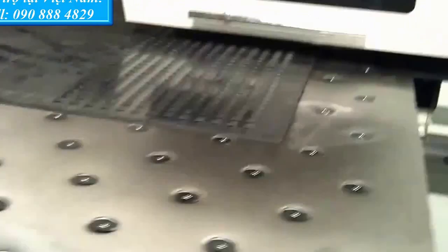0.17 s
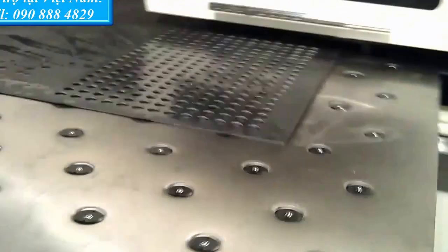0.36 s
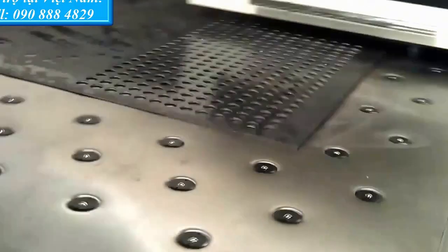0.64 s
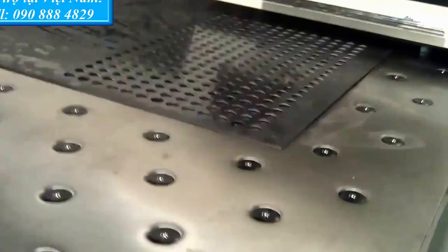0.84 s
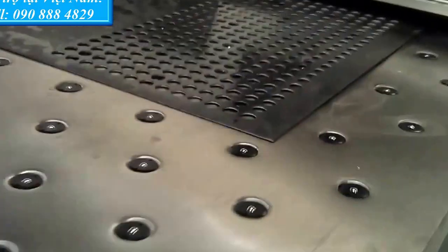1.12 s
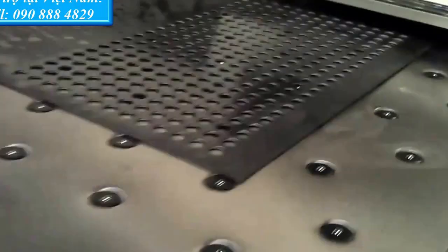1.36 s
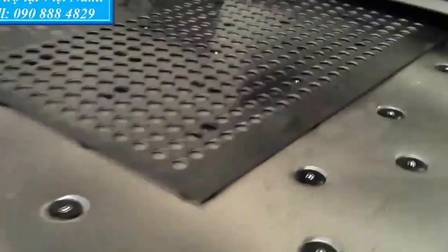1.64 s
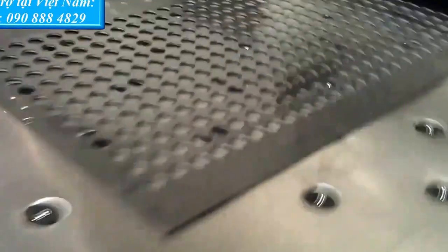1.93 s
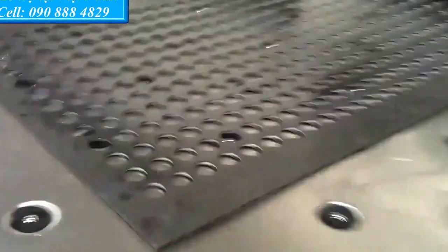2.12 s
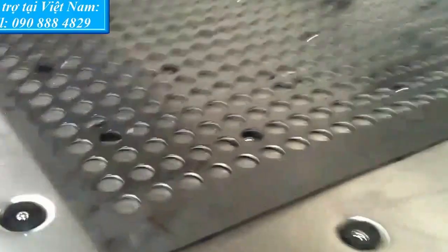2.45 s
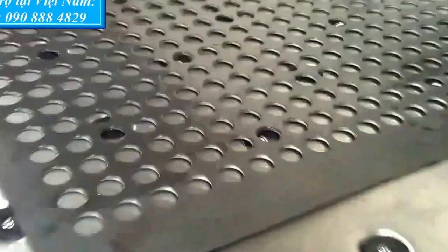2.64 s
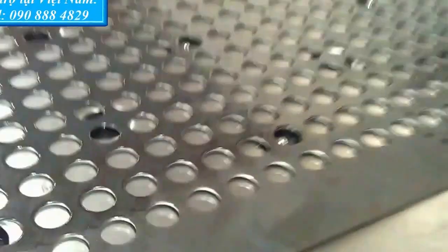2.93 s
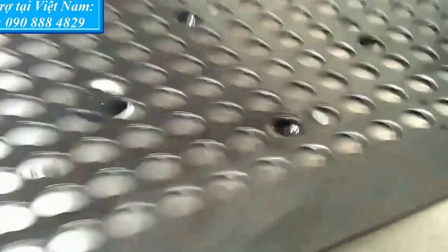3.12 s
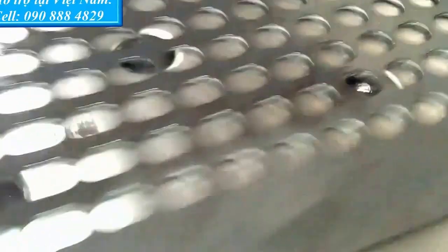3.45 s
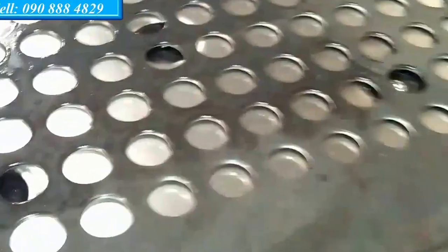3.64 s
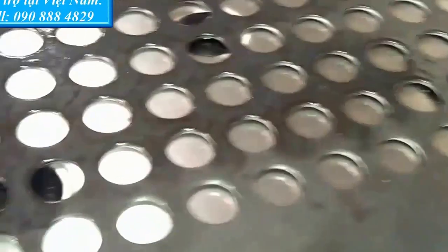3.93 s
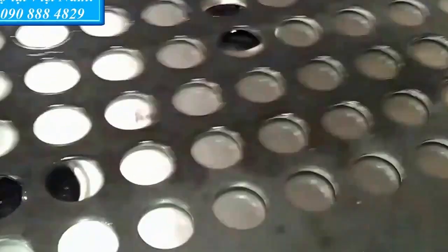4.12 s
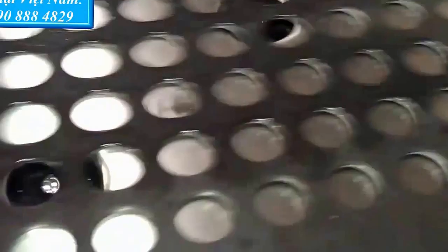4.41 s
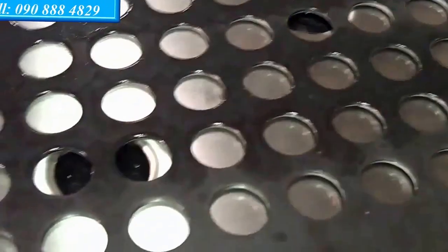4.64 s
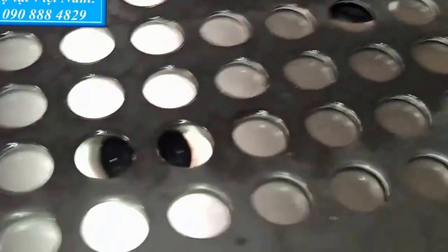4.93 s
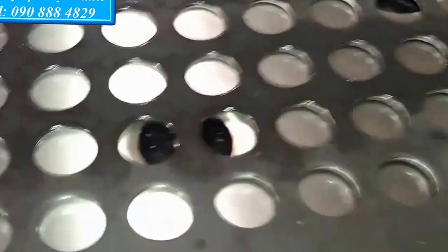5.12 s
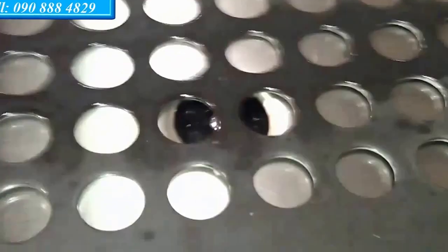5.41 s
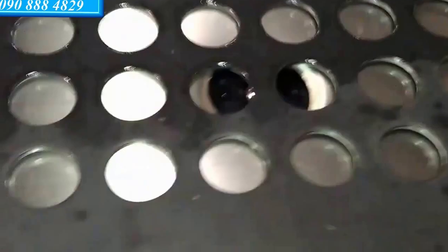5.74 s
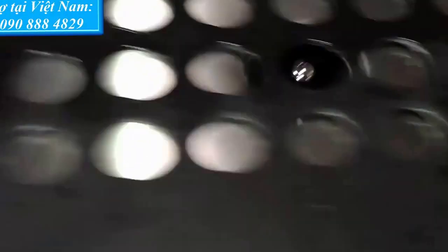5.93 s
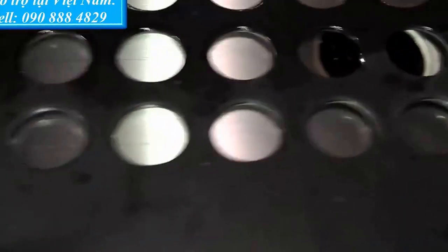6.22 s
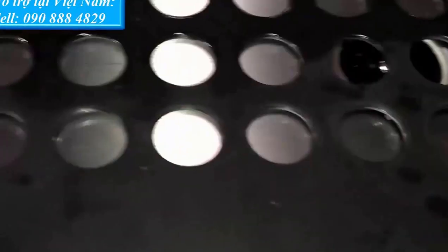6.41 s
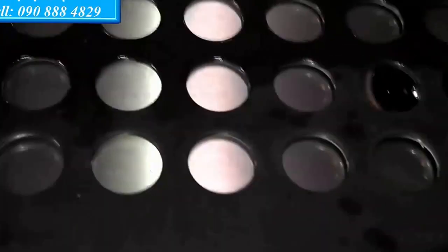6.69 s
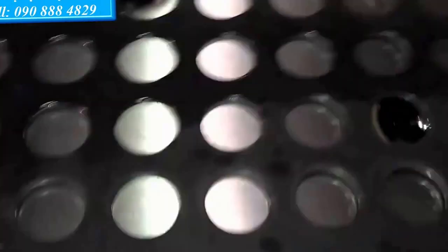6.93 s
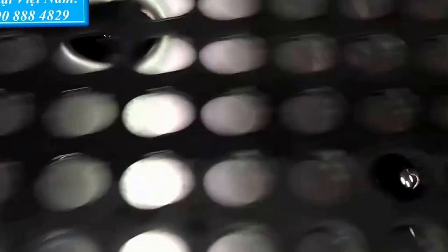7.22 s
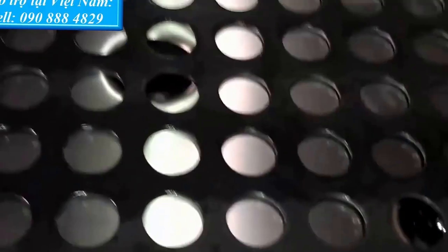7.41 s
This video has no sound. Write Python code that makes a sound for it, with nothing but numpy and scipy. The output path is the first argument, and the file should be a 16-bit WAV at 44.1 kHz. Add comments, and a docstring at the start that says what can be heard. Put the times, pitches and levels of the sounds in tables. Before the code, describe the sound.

Rapid, evenly spaced metallic punches ring out close by, with a steel sheet rumbling and scraping between them while hydraulics and fans run.

```python
"""Turret punch press, close up

A stereo pair edges in over a steel sheet being perforated, about three strokes a second.
Before each stroke the sheet is dragged over the ball table: it rumbles and rattles ever louder,
sometimes squealing. The stripper plate pins it, the punch breaks through with a ringing crack,
and the returning ram stops with a softer clack. Hydraulics and fans run on underneath."""
import sys
import numpy as np
from scipy import signal
from scipy.fft import rfft, irfft, next_fast_len
from scipy.io import wavfile
from scipy.ndimage import uniform_filter1d, map_coordinates

SR = 44100
rng = np.random.default_rng(int(sys.argv[2]) if len(sys.argv) > 2 else 0)


def store_pcm(level_fs):
    """Save levels as 16-bit WAV."""
    pcm = np.round(np.clip(level_fs, -1, 1) * 32767).astype(np.int16)
    wavfile.write(sys.argv[1], SR, np.atleast_2d(pcm).T)


N = 333396
TIME = np.arange(N) / SR


def amp(db):
    """Decibels to gain."""
    return np.exp(np.maximum(db, -300) * np.log(10) / 20)


def unit(x):
    """Scaled to rms 1."""
    return x / np.sqrt(np.mean(x ** 2) + 1e-20)


def along(points, hz):
    """(Hz, value) points joined on a log axis."""
    f, v = np.transpose(points)
    return np.interp(np.log(hz + 1), np.log(f + 1), v)


def wobble(rate):
    """A smooth random curve, rate knots a second."""
    return map_coordinates(rng.standard_normal(int(N * rate / SR) + 4), [TIME * rate])


def filtered(x, response):
    """x times a complex response of frequency."""
    size = next_fast_len(N + SR // 2)
    return irfft(rfft(x, size) * response(np.fft.rfftfreq(size, 1 / SR)), size)[..., :N]


def noise():
    """Two unrelated white noises."""
    return rng.standard_normal((2, N))


def contacts(rate, spread_db, smooth):
    """Random tiny impacts of uneven size, blended with a share of smooth rubbing."""
    hits = (rng.random(N) < rate / SR) * amp(spread_db * rng.standard_normal(N)) * noise()
    return np.sqrt(1 - smooth) * unit(hits) + np.sqrt(smooth) * noise()


def patchy(x, depth_db):
    """Narrow bands swell and fade at random, giving the noise a flickering, faintly tonal grain."""
    bands = signal.stft(x, nperseg=512)[2]
    flicker = uniform_filter1d(rng.standard_normal(bands.shape[1:]), size=2, axis=0)
    flicker = uniform_filter1d(flicker, size=7, axis=1)
    return signal.istft(bands * amp(depth_db * unit(flicker)), nperseg=512)[1][:, :N]


def swell(s, growth, t60):
    """Grows by growth dB/s up to time s, passing gain 1 at 26 ms before it, then dies."""
    t = TIME - s
    return amp((np.minimum(t, 0) + 0.026) * growth - 60 * np.maximum(t, 0) / t60)


def burst(s, rise, hold, t60):
    """A blow at time s: climbs its last 20 dB over rise seconds, holds, then dies."""
    t = TIME - s
    return amp(-20 * np.maximum(-t, 0) / rise - 60 * np.maximum(t - hold, 0) / t60)


def together(gains):
    """Unrelated sounds add in power."""
    return np.sqrt(sum(g ** 2 for g in gains))


# likeness of the two microphones: f/Hz, coherence (capped at 1)
MIC_COHERENCE = [(50, 0.8), (140, 1), (250, 1.3), (400, 1.18), (650, 0.536), (1000, -0.16), (2000, 0.27),
                 (5000, 0.21), (9000, 0.24), (13000, 0.22)]
# lead of the left microphone: f/Hz, phase/rad
MIC_LEAD = [(100, -0.2), (260, 0.14), (360, 1.38), (450, 2), (620, 3), (850, 4), (1250, 2 * np.pi)]
# left microphone over right: f/Hz, level/dB
MIC_BALANCE = [(90, 6), (250, 0), (1500, .3), (4300, 3.5), (6000, 5), (7000, 4), (8200, -1.5), (9500, 1),
               (11000, 6), (13500, 16.5)]

def at_mics(drive, spectrum, widen=0.7, delay_s=.00995):
    """Two drives coloured by a body and placed between the microphones, at rms 1."""
    def mid_and_side(hz):
        angle = np.arccos(np.clip(along(MIC_COHERENCE, hz), -1, 1)) / 2
        return amp(along(spectrum, hz)) * [np.cos(angle), np.sin(angle)]

    def left_and_right(hz):
        tilt = amp(along(MIC_BALANCE, hz) / 2)
        return np.array([tilt * np.exp(1j * along(MIC_LEAD, hz)), 1 / tilt])

    mid, side = filtered(drive, mid_and_side)
    left, right = filtered(np.array([mid + side, mid - side]), left_and_right)
    # a 10 ms delayed copy of the side signal widens the stereo image
    delayed_side = widen * np.roll(left - right, round(delay_s * SR))
    wide = (left - right + delayed_side) / np.hypot(1, widen)
    return unit(np.array([left + right + wide, left + right - wide]))


# spectrum of the running press, behind the strokes: f/Hz, level/dB
MACHINE_SPECTRUM = [(30, -64), (70, -23), (120, -17), (180, -6.5), (280, -1), (480, 1), (800, 0.5),
                    (1300, -7.5), (2700, -7.5), (4300, -6), (6800, -8), (9000, -3.5), (11000, -10.5),
                    (13000, -23)]

def machine():
    """Hydraulics and fans rush steadily, with a slight throb in the bass."""
    rush = at_mics(patchy(noise(), depth_db=3.13), MACHINE_SPECTRUM)
    bass = filtered(rush, lambda hz: 1 / (1 + (hz / 400) ** 4))
    throb = amp(3 * wobble(35))
    return amp(-27.5 + 0.42 * wobble(4.6)) * (rush - bass + bass * throb)


def by_drag(drag_db, usual, per_db):
    """A quantity that rises with the drag from its usual value at -22.5 dB."""
    return usual + per_db * (drag_db + 22.5)


def sliding(s, lead_s=.11, waiting_db=-3):
    """Gain that steps up as the sheet starts to move toward the stroke at time s."""
    return amp(waiting_db * np.clip((s - lead_s - TIME) / .02, 0, 1))


# one stroke per hole: t/s, crack level/dB, drag level/dB, ring level/dB (each within its own layer)
STROKES = [(0.184, -13.5, -28, -14), (0.5011, -9, -24.5, -14), (0.817, -13, -18.5, -11.5),
           (1.129, -11, -20.5, -15), (1.441, -13, -25, -8), (1.7567, -11, -28.5, -16),
           (2.0733, -6, -19, -15), (2.3854, -6, -24.5, -22), (2.701, -7, -23.5, -24),
           (3.0137, -12, -24, -8.5), (3.325, -12, -23, -28), (3.6407, -5.5, -18.5, -22),
           (3.951, -11, -23, -28), (4.2645, -5.5, -15.5, -30), (4.5762, -8.5, -19, -9),
           (4.888, -4.5, -20.5, -17), (5.2039, -9, -27, -10), (5.515, -9, -26.5, -18),
           (5.829, -13.5, -18.5, -30), (6.1453, 0, -15, -24), (6.4602, -20.5, -35, -32),
           (6.77, -18, -30.5, -30), (7.064, -18.5, -19.5, -32), (7.3943, -6.5, -19, -22)]
# spectrum of the sheet flapping on the table: f/Hz, level/dB
RUMBLE_SPECTRUM = [(40, -61), (80, -25), (120, -9), (190, -1.5), (260, 2), (400, -1.5), (520, 1.5),
                   (650, -2), (850, -5), (1200, -12.5), (2500, -17), (6000, -45)]

def sheet_rumble(clamp_lead_s=.013):
    """The moving sheet flaps ever louder, until the stripper plate pins it with a knock."""
    flaps = []
    for s, _, drag_db, _ in STROKES:
        growth = by_drag(drag_db, usual=131, per_db=6.8)
        flaps.append(amp(drag_db) * sliding(s) * swell(s - .003, growth, t60=.045))
        flaps.append(amp(drag_db - 1) * burst(s - clamp_lead_s, rise=.006, hold=.0096, t60=.04))
    knocks = contacts(rate=350, spread_db=-0.3, smooth=0.48)
    return amp(2.05) * together(flaps) * at_mics(knocks, RUMBLE_SPECTRUM)


# spectrum of the sheet on the table's balls: f/Hz, level/dB
RATTLE_SPECTRUM = [(300, -39), (800, -2), (1500, -3), (2700, -2.5), (4300, 1.5), (6800, -3), (8500, 0.5),
                   (9800, -0.5), (11500, -11.5), (13500, -31)]

def sheet_rattle(close_db=-2):
    """Hole edges chatter over the balls, a little softer as the microphones move in."""
    chatters = []
    for s, _, drag_db, _ in STROKES:
        db = by_drag(drag_db, usual=-20, per_db=0.41) + close_db * closeness(s)
        growth = by_drag(drag_db, usual=94, per_db=4)
        chatters.append(amp(db) * sliding(s) * swell(s - .004, growth, t60=.14))
    scrapes = patchy(contacts(rate=3600, spread_db=3.5, smooth=0.79), depth_db=4)
    flutter = amp(-0.03 + 1.53 * wobble(120))
    return together(chatters) * at_mics(scrapes, RATTLE_SPECTRUM) * flutter


# drags that squeal: end t/s, f/Hz, level/dB
SQUEALING_DRAGS = [(.18, 9880, -19.5), (1.125, 10100, -29), (1.44, 10170, -23.5), (1.765, 10140, -21.5),
                   (2.7, 10300, -35), (3.015, 10330, -23), (3.315, 10200, -27.5), (4.58, 10750, -32),
                   (5.83, 8540, -20)]

def squeals(width_hz=130, hold_s=.052):
    """Stick and slip excites one narrow high resonance until the sheet is pinned."""
    out = np.zeros((2, N))
    for end, hz, db in SQUEALING_DRAGS:
        resonance = unit(filtered(noise(), lambda f: 1 / (1 + ((f - hz) / width_hz) ** 2)))
        out += amp(db) * resonance * burst(end - hold_s, rise=.061, hold=hold_s, t60=.06)
    return out


# extra sharp blows: slaps of the sheet on the table, the last the late crack of the 7.06 s stroke: t/s,
# relative level/dB
EXTRA_BLOWS = [(2.931, -31), (5.107, -21.5), (6.721, -20), (7.077, -21)]
# strength of the ram's clack over time: t/s, level/dB
RAM_LEVEL = [(.5, -34), (1.45, -22.5), (1.8, -26.5), (2.7, -26), (3.3, -19), (3.64, -22.5), (3.95, -19),
             (4.3, -24), (4.9, -22.5), (5.2, -35)]

def clacks(return_s=.0967):
    """The ram slides back up and stops with a clack; now and then the sheet slaps the table or a crack lands
    late."""
    blows = [amp(db + 2.5) * burst(s, rise=.0023, hold=.0035, t60=.044) for s, db in EXTRA_BLOWS]
    for s, *_ in STROKES:
        db = np.interp(s, *np.transpose(RAM_LEVEL))
        clack = amp(db) * burst(s + return_s, rise=.004, hold=.0034, t60=.055)
        slide = amp(db - 3) * burst(s + return_s, rise=.04, hold=.002, t60=.05)
        blows += [clack, slide]
    steel = at_mics(noise(), CRACK_SPECTRUM)
    body = amp(-6) * at_mics(noise(), RUMBLE_SPECTRUM)
    return together(blows) * (steel + body)


# modes of the punched steel: f/Hz, relative level/dB
STEEL_MODES = [(4340, 2), (4410, 2.5), (4480, 3), (5030, 5), (5100, 1), (5240, 6), (5320, 2), (5400, 7)]
# where the steel rings best as the punch travels over it: t/s, f/Hz
RING_CENTRE = [(.5, 5030), (.82, 5320), (1.12, 4400), (3.1, 4400), (4.5, 5320)]

def steel_ring(detune=.0053, t60=.032, focus_hz=200):
    """Every stroke rings the steel's modes before the stripper plate damps them."""
    out, t = np.zeros((2, N)), np.arange(SR // 8) / SR
    hz, mode_db = np.transpose(STEEL_MODES)
    envelope = (1 - np.exp(-t / .00015)) * amp(-60 * t / t60)
    for s, _, _, ring_db in STROKES:
        modes = hz * (1 + detune * rng.standard_normal(len(hz)))
        centre_hz = np.interp(s, *np.transpose(RING_CENTRE))
        gains = amp(mode_db) / (1 + ((hz - centre_hz) / focus_hz) ** 2)
        phase = rng.uniform(0, 2 * np.pi, (len(hz), 1))
        mic_phase = rng.normal(0, 1, (2, len(hz), 1))
        tone = gains @ np.sin(2 * np.pi * modes[:, None] * t + phase + mic_phase)
        start = round((s + .001) * SR)
        out[:, start:start + len(t)] += amp(ring_db) * envelope * tone
    return out * amp([[2.5], [-.5]])  # louder in the left microphone


# spectrum of the press frame: f/Hz, level/dB
FRAME_SPECTRUM = [(15, -15), (30, -11), (70, 0), (130, 21), (300, -30)]

def frame_thump(usual_db=-44, usual_crack_db=-9.5):
    """The frame thumps with each stroke, harder under a louder crack."""
    blows = np.zeros(N)
    for s, crack_db, *_ in STROKES:
        db = usual_db + 0.7 * (crack_db - usual_crack_db)
        blows += amp(db) * burst(s - .008, rise=.023, hold=.022, t60=.07)
    return blows * at_mics(noise(), FRAME_SPECTRUM)


# spectrum of struck steel at close range: f/Hz, level/dB
CRACK_SPECTRUM = [(80, -34), (200, -8), (500, -2), (900, -7), (1400, -10), (2000, -7), (3200, -7),
                  (4300, -2), (5200, -3), (6300, -4.5), (8400, 0), (10500, -6.5), (13500, -19)]

def punch_crack(dispersion=.18, treble_db=-1.2):
    """The punch breaks through; the crack runs through the sheet as bending waves, highs first."""
    def bending(hz):
        lag_cycles = dispersion * (2 * np.sqrt(hz + 600) - hz / np.sqrt(9000))
        return np.exp(-2j * np.pi * lag_cycles)

    blows = np.zeros(N)
    for s, crack_db, *_ in STROKES:
        snap = burst(s, rise=.0006, hold=.004, t60=.035)
        shudder = amp(-14) * burst(s, rise=.0006, hold=.021, t60=.06)
        blows += amp(crack_db) * (snap + shudder)
    steel = at_mics(patchy(noise(), depth_db=2.5), CRACK_SPECTRUM)
    body = filtered(steel, lambda hz: 1 / (1 + (hz / 6500) ** 8))
    crack = blows * (body + amp(treble_db) * (steel - body))
    return amp(2.5) * filtered(crack, bending)


# the microphones' path in over the sheet: t/s, closeness (0 far, 1 near)
MIC_PATH = [(0, 0), (1.4, 0.11), (2.4, 0.3), (4.2, 0.56), (6, 0.77), (7.5, 0.92)]

def closeness(s):
    """How far the microphones have moved in at time s."""
    return np.interp(s, *np.transpose(MIC_PATH))


# colour gained from midway to the nearest position: f/Hz, level/dB
NEAR_COLOUR = [(60, -1), (140, -0.5), (300, -0.5), (800, -3), (1600, -3.5), (2800, 2), (4300, -2),
               (6000, 2), (9800, -0.5), (12000, 2)]

def approach(x):
    """The colour shifts as the microphones near the sheet."""
    close = closeness(TIME)
    near = filtered(x, lambda hz: amp(along(NEAR_COLOUR, hz)))
    far = filtered(x, lambda hz: amp(-along(NEAR_COLOUR, hz)))
    return close * near + (1 - close) * far


def scene():
    """The whole press, heard from beside the ball table."""
    press = machine() + sheet_rumble() + sheet_rattle() + punch_crack() + frame_thump() + clacks()
    return approach(press) + steel_ring() + squeals()


def record(dry, threshold_db=-13, slope=0.42, recovery_db_per_s=16, ceiling=0.98, top_hz=14150):
    """Gain control ducks after the loudest strokes; peaks are rounded and the band is limited."""
    power = signal.lfilter([1], [1, -np.exp(-1 / (0.08 * SR))], np.mean(dry ** 2, 0)) / (0.035 * SR)
    cut_db = slope * np.maximum(10 * np.log10(power + 1e-12) - threshold_db, 0)
    recovery_db = recovery_db_per_s * TIME
    duck_db = np.maximum.accumulate(cut_db + recovery_db) - recovery_db
    ducked = dry * amp(-duck_db)
    rounded = ducked / (1 + np.abs(ducked / ceiling) ** 6) ** (1 / 6)
    return filtered(rounded, lambda hz: hz < top_hz)


dry = scene()
out = record(dry)
store_pcm(out)
```